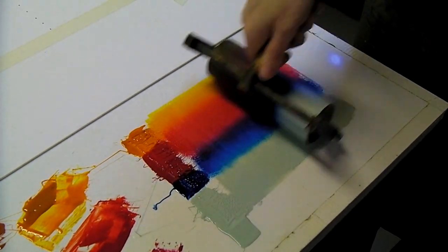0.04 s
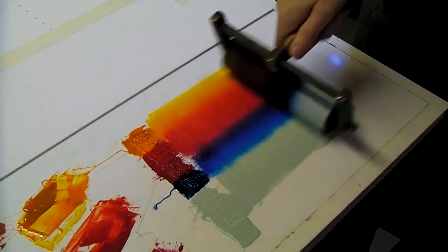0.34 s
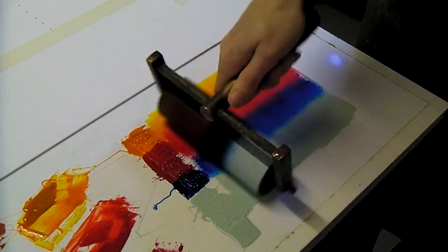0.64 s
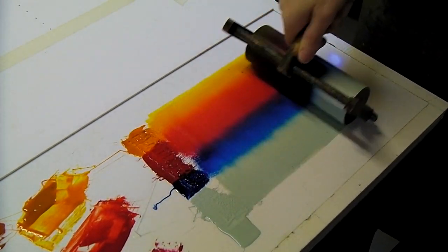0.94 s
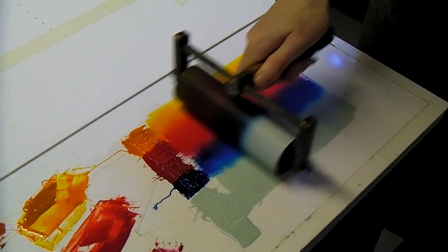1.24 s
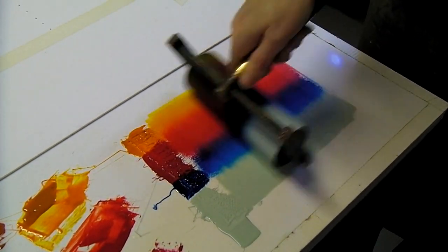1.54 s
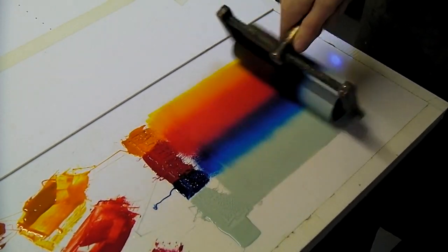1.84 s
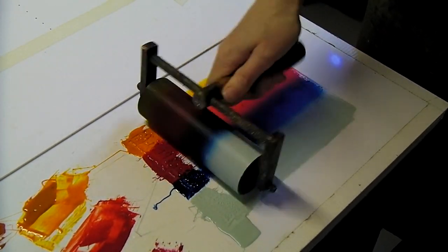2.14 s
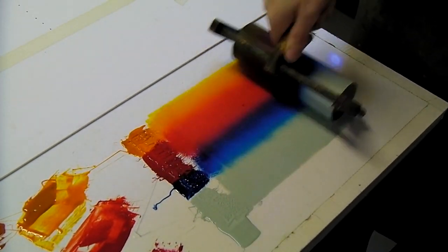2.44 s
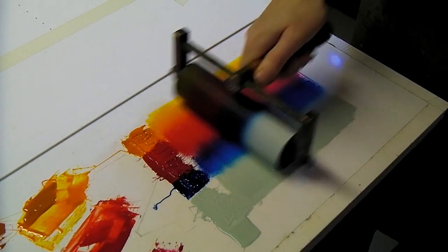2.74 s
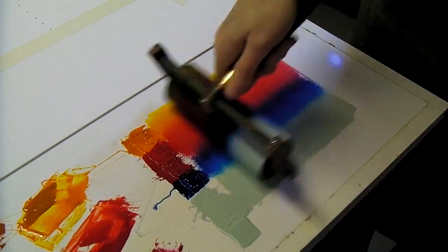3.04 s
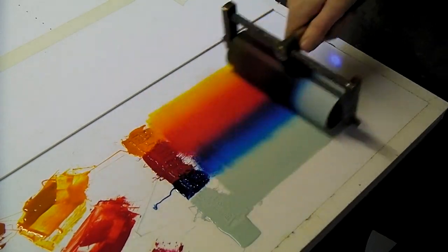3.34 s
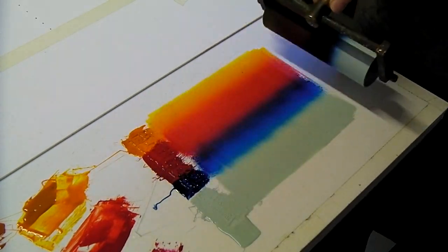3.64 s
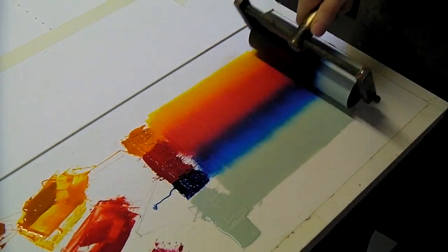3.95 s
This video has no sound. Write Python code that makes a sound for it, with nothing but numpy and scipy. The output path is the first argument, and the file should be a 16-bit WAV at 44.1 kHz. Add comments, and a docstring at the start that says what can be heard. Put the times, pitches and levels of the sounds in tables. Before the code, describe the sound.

Tacky hiss of an ink roller pushed and pulled quickly across a slab, then lifted.

```python
"""A sticky ink roller, pushed and pulled over a tacky slab at two round trips a second, then lifted.
Ink threads snap behind it in a dense hiss: open and bright on the pull, shaded by the roller on the push.
The table drums under the rolling, the loose frame chatters and knocks, and the dry axle squeaks once.
At the lift the frame ticks and the roller spins on briefly, in a small quiet room."""
import sys
import numpy as np
from scipy import signal
from scipy.io import wavfile
from scipy.ndimage import uniform_filter1d, map_coordinates

SR = 44100
rng = np.random.default_rng(int(sys.argv[2]) if len(sys.argv) > 2 else 0)


def bounce(signal):
    """Save signal as a 16-bit WAV file at the path given by the first command-line argument."""
    frames = np.transpose(np.atleast_2d(signal))
    limited = np.clip(frames, -1, 1)
    pcm = np.round(limited * 32767).astype(np.int16)
    wavfile.write(sys.argv[1], SR, pcm)


N = 176400
T = np.arange(N) / SR
LIFT_S = 3.56  # the roller leaves the slab


def amp(db):
    """Decibels to gain."""
    return 10 ** (np.asarray(db) / 20)


def unit_rms(x):
    """Scales to rms 1."""
    return x / np.sqrt(np.mean(x ** 2) + 1e-20)


def curve_at(points, hz):
    """Reads a curve on a log-frequency axis."""
    freqs, values = np.transpose(points)
    return np.interp(np.log(hz + 1), np.log(freqs + 1), values)


def add(mix, start_s, sound):
    """Mixes a sound in at its cue."""
    part = mix[max(round(start_s * SR), 0):][:len(sound)]
    part += sound[:len(part)]


def eq(x, curve, keep_power=True):
    """Minimum-phase EQ; keep_power holds white noise at the same level."""
    log_gain = np.log(amp(curve_at(curve, np.fft.rfftfreq(4096, 1 / SR))))
    mirrored = np.r_[log_gain, log_gain[-2:0:-1]]
    taps = np.fft.ifft(np.exp(np.conj(signal.hilbert(mirrored)))).real[:len(log_gain)]
    return signal.oaconvolve(x, taps / (np.linalg.norm(taps) if keep_power else 1))[:len(x)]


def lowpass(x, hz):
    """Gentle treble roll-off."""
    return signal.sosfilt(signal.butter(1, hz, fs=SR, output="sos"), x)


def highpass(x, hz):
    """Gentle bass roll-off."""
    return x - lowpass(x, hz)


def delayed(x, ms):
    """Delays by a steady or moving time."""
    return map_coordinates(x, [np.arange(N) - ms * SR / 1000], order=3, mode="nearest")


def noise_band(size, hz, width_hz):
    """Noise through one resonance."""
    return unit_rms(signal.lfilter(*signal.iirpeak(hz, hz / width_hz, SR), rng.standard_normal(size)))


# Decay of the small room: freq_hz, t60_s
ROOM_DECAY = [(100, 0.33), (500, 0.75), (2000, 1), (6000, 0.52), (11000, 0.38), (16000, 0.32)]
def room(x, wet_db):
    """Reverb return: a diffuse stereo tail that dies band by band."""
    hz, t, noise = signal.stft(rng.standard_normal((2, SR // 2)), SR, nperseg=256)
    decay = amp(-60 * t / curve_at(ROOM_DECAY, hz)[:, None]) * (t > .004)
    tail = signal.istft(noise * decay, SR, nperseg=256)[1]
    tail /= np.linalg.norm(tail, axis=1, keepdims=True)
    return amp(wet_db) * signal.fftconvolve(x[None], tail, axes=1)[:, :N]


# Hand strokes: start_s, end_s, hiss_db, fastest_at_fraction, rumble_db, chatter_db
PUSH_STROKES = [(-.2, .266, -31, 0.59, -41.5, -43.5), (.502, .747, -30, 0.48, -45.5, -50),
                (.995, 1.237, -30.5, 0.46, -45, -55.5), (1.478, 1.717, -30, 0.51, -42, -55.5),
                (1.97, 2.215, -30.2, 0.53, -47, -50), (2.468, 2.716, -30, 0.45, -40, -49),
                (2.958, 3.197, -29.5, 0.51, -43.5, -50.5)]  # towards the listener
PULL_STROKES = [(.268, .492, -23, 0.59, -40, -50.5), (.751, .988, -24.5, 0.62, -42, -51),
                (1.240, 1.470, -24.5, 0.63, -42.5, -54), (1.719, 1.964, -24.5, 0.67, -40, -53),
                (2.219, 2.462, -24, 0.66, -40, -53.5), (2.724, 2.952, -24, 0.57, -34.5, -51),
                (3.201, 3.5, -24.5, 0.38, -39.5, -53.5)]  # away from the listener
def motion(strokes, start_speed, creep_speed=0, attack_s=.001, release_s=.008):
    """Each stroke is an arch of speed; gives speed, progress and the hiss, rumble and chatter gains."""
    speed, progress, gains = np.zeros(N), np.zeros(N), np.zeros((3, N))
    for k, (start, end, hiss_db, fastest_at, rumble_db, chatter_db) in enumerate(strokes):
        elapsed = np.clip((T - start) / (end - start), 0, 1)
        skewed = np.interp(elapsed, [0, fastest_at, 1], [0, .5, 1])
        arch = start_speed * (1 - skewed) + (1 - start_speed / 2) * np.sin(np.pi * skewed)
        if creep_speed and k == len(strokes) - 1:  # the last stroke creeps on until the lift
            arch, end = np.maximum(arch, creep_speed), LIFT_S
        gate = np.clip((T - start) / attack_s, 0, 1) * np.clip((end - T) / release_s + .5, 0, 1)
        on = T >= start
        speed[on] = np.maximum(arch[on], 0)
        progress[on] = (1 - np.cos(np.pi * elapsed[on])) / 2
        gains[:, on] = np.outer(amp([hiss_db, rumble_db, chatter_db]), gate[on])
    return speed, progress, gains


def ink_threads(speed, rate_hz, spread_db, treble_power, body_power, split_hz):
    """Ink threads snap at a rate that follows speed; slow rolling sounds thinner."""
    sizes = amp(spread_db * np.minimum(rng.exponential(1, N), 5)) * rng.choice([-1, 1], N)
    chance = np.minimum(rate_hz * (speed + .1) / SR, 1)
    snaps = unit_rms(sizes * (rng.random(N) < chance) / np.sqrt(chance))
    body = lowpass(snaps, split_hz)
    return body * speed ** body_power + (snaps - body) * speed ** treble_power


# Tone of the ink on the push: freq_hz, relative_db
PUSH_EQ = [(50, -62), (300, -35), (900, -42), (1400, -20.5), (2200, -13), (3500, -9), (5500, -0.5),
           (7200, 0.5), (9500, 2), (11500, 4), (13500, 2), (16000, -1.5)]
# The roller's shadow on the left ear: freq_hz, gain_db
SHADOW_EQ = [(500, -24), (3800, 1.5), (5500, -6), (7000, -8.5), (9500, -8.5), (12000, -11.5), (16000, -6)]
def push_hiss(speed, progress, gain, wide_above_hz=5500, near_ms=.5, far_ms=1.3):
    """The ink parts behind the roller; a lengthening reflection sweeps the hiss downward."""
    snaps = [ink_threads(speed, rate_hz=17000, spread_db=2.5, treble_power=.36, body_power=.74,
                         split_hz=14000) for _ in range(2)]
    layers = [eq(gain * layer, PUSH_EQ) for layer in snaps]
    wander = np.interp(T, np.linspace(0, T[-1], 20), rng.standard_normal(20))
    echo_ms = (near_ms + (far_ms - near_ms) * progress) * np.exp(.19 * wander)
    right, spare = [layer + .5 * delayed(lowpass(layer, 8000), echo_ms) for layer in layers]
    # The ears share the body of the hiss; each has its own treble.
    left = delayed(lowpass(right, wide_above_hz), ms=.0275) + highpass(spare, wide_above_hz)
    left = eq(left, SHADOW_EQ, keep_power=False)
    pan = amp(3 * progress - 1.5)  # drifts leftward
    return amp(5) * np.array([left * pan, right / pan]) + room(highpass(right, 3000), wet_db=-1.5)


# Resonances of the tabletop: pitch_hz, relative_db, t60_s
TABLE_MODES = [(73, -51, .25), (96, -49, 0.19), (120.6, -6, 0.26), (152.85, 2, 0.61), (163, -37, 0.35),
               (219.7, -21.5, 0.23), (255.7, -17, 0.5)]
# Bumps of the roller on the table: start_s, strength_db
ROLLER_BUMPS = [(.005, -30), (0.071, -45.5), (0.187, -40), (.368, -38), (0.633, -38.5), (1.376, -37),
                (1.609, -39), (1.851, -49), (2.195, -39), (2.358, -35.5), (2.777, -38), (3.26, -37),
                (3.428, -50)]
def table_drum(rolling, lag_s=.066, steady_s=.044):
    """Rolling and single bumps ring the table; its hum trails the roller's speed."""
    t = T[:SR // 2]
    ring = sum(amp(db - 60 * t / t60) * np.cos(2 * np.pi * hz * t) for hz, db, t60 in TABLE_MODES)
    hum = signal.fftconvolve(rng.standard_normal(N + len(t)), ring, "valid")[:N]
    hum /= np.sqrt(uniform_filter1d(hum ** 2, int(steady_s * SR)) + 1e-12)  # levels out the swells
    bumps = np.zeros(N)
    for start_s, strength_db in ROLLER_BUMPS:
        add(bumps, start_s, amp([strength_db]))
    drum = hum * np.interp(T - lag_s, T, rolling) + signal.fftconvolve(bumps, ring)[:N]
    drum = signal.sosfilt(signal.butter(2, [67, 330], "band", fs=SR, output="sos"), drum)
    return drum * amp([[.7], [-.7]]) + room(drum, wet_db=-20)


# Dull body of the frame: freq_hz, relative_db
FRAME_EQ = [(40, -44), (100, -3), (170, 7.5), (220, 2.5), (260, 0), (320, -6.5), (380, 6.5), (430, -4),
            (540, -6), (700, -13), (1100, -14), (2000, -24), (5000, -61)]
# Hard edge of a knock: freq_hz, relative_db
CLICK_EQ = [(200, -16), (650, -6.5), (1000, -13), (1400, -20), (2500, -18), (10000, -28)]
# Knocks of the loose frame: start_s, level_db, click_relative_db
FRAME_KNOCKS = [(.005, -31, -18), (0.069, -38, -14), (0.116, -52, -26), (.367, -47, -1), (.405, -37.5, -28),
                (0.564, -43, 1), (0.584, -45.5, -5), (0.632, -40.5, -22), (0.882, -42, -7),
                (1.127, -42.5, -17), (1.38, -43, -11), (1.86, -40, -22), (2.36, -36.5, -8),
                (2.403, -38, -24), (2.52, -48.5, 9.5), (2.547, -43.5, -8), (3.072, -44.5, -20),
                (3.44, -42.5, -25)]
def frame_rattle(chatter, thud_t60_s=.12, click_t60_s=.042):
    """Play in the axle gives a chatter and dull knocks, some with a hard click."""
    t = T[:SR // 5]
    rattle = eq(chatter * rng.standard_normal(N), FRAME_EQ)
    for start_s, level_db, click_db in FRAME_KNOCKS:
        thud = eq(rng.standard_normal(len(t)) * amp(-60 * t / thud_t60_s), FRAME_EQ)
        click = eq(rng.standard_normal(len(t)) * amp(click_db - 60 * t / click_t60_s), CLICK_EQ)
        add(rattle, start_s, amp(level_db) * (thud + click))
    return rattle + room(rattle, wet_db=-8.5)


def axle_squeak(level_db=-45.5, length_s=.075):
    """The dry axle squeaks faintly on the first push."""
    fade = np.sqrt(np.clip(1 - (T / length_s) ** 2, 0, 1))
    squeak = amp(level_db) * noise_band(N, hz=2560, width_hz=210) * fade
    return squeak + room(squeak, wet_db=-7)


# Background of the quiet room: freq_hz, relative_db
ROOM_TONE_EQ = [(25, -13), (70, 3.5), (145, 4.5), (300, -12), (500, -2), (800, -9.5), (2000, -9.5),
                (5000, -11.5), (10000, -14.5), (16000, -16)]
def room_tone(mid_db=-54.5, mono_below_hz=300):
    """A faint bed: centred rumble under a wide, even hiss."""
    mid, side = [eq(rng.standard_normal(N), ROOM_TONE_EQ) for _ in range(2)]
    side = 1.48 * highpass(side, mono_below_hz)
    return amp(mid_db) * np.array([mid + side, mid - side])


# Tone of the ink on the pull: freq_hz, relative_db
PULL_EQ = [(50, -55), (300, -35), (900, -33.5), (1400, -20.5), (2200, -14), (3500, -8), (5500, -2.5),
           (7500, -3), (9500, 0), (11500, 1.5), (13500, 1), (16000, -6.5)]
def pull_hiss(speed, progress, gain, drift_db=-3, width=.3, wide_above_hz=2500):
    """The ink parts facing the listener: an open hiss that drifts right as the roller recedes."""
    snaps = [ink_threads(speed, rate_hz=15000, spread_db=2, treble_power=.39, body_power=.81,
                         split_hz=7000) for _ in range(2)]
    mid, ends = [eq(gain * layer, PULL_EQ) for layer in snaps]
    side = width * highpass(ends, wide_above_hz)
    pan = amp(drift_db * progress / 2)
    direct = np.array([(mid + side) * pan, (mid - side) / pan])
    return direct + room(highpass(mid, wide_above_hz), wet_db=-8.5)


def frame_tick(start_s=3.539, level_db=-37.5, t60_s=.03):
    """The frame ticks as the hand starts to lift it."""
    t, tick = T[:SR // 5], np.zeros(N)
    add(tick, start_s, amp(level_db - 60 * t / t60_s) * noise_band(len(t), hz=1920, width_hz=1900))
    return tick + room(tick, wet_db=-7)


def free_spin(fade_s=.14):
    """The roller spins free: a low hum and a dry whirr swell and fade around the lift."""
    swell = np.sqrt(np.clip(1 - ((T - LIFT_S) / fade_s) ** 2, 0, 1))
    hum = amp(-47) * noise_band(N, hz=150, width_hz=25)
    whirr = amp(-59) * noise_band(N, hz=2870, width_hz=1200)
    spin = swell * (hum + whirr)
    return spin + room(spin, wet_db=-12)


def scene():
    """The strokes drive the hiss, the table and the frame; small details sit on top."""
    push_speed, push_progress, push_gains = motion(PUSH_STROKES, start_speed=.068)
    pull_speed, pull_progress, pull_gains = motion(PULL_STROKES, start_speed=.33, creep_speed=.14)
    _, rolling, chatter = push_speed * push_gains + pull_speed * pull_gains
    pull = pull_hiss(pull_speed, pull_progress, pull_gains[0])
    push = push_hiss(push_speed, push_progress, push_gains[0])
    roller = push + pull + table_drum(rolling) + frame_rattle(chatter)
    return roller + axle_squeak() + room_tone() + frame_tick() + free_spin()


def record(dry, notch_hz=7870, notch_width_hz=440, cutoff_hz=15850):
    """Master EQ: a narrow treble notch and a steep high cut."""
    notched = signal.lfilter(*signal.iirnotch(notch_hz, notch_hz / notch_width_hz, SR), dry)
    high_cut = signal.firwin(611, cutoff_hz, window=("kaiser", 9), fs=SR)
    return signal.oaconvolve(notched, high_cut[None], "same")


dry = scene()
out = record(dry)
bounce(out)
```